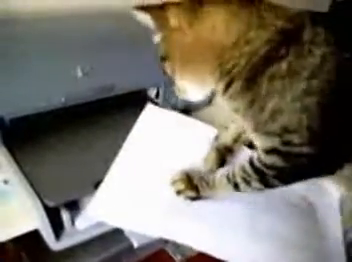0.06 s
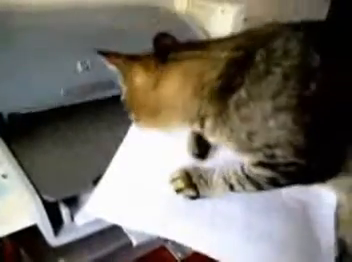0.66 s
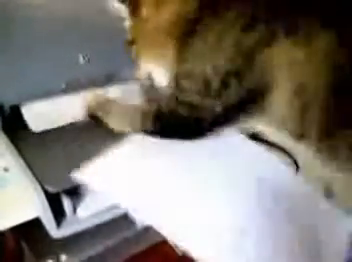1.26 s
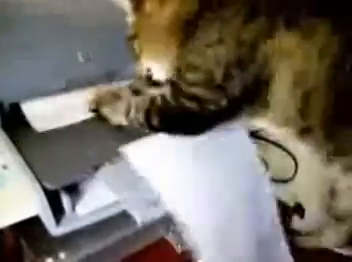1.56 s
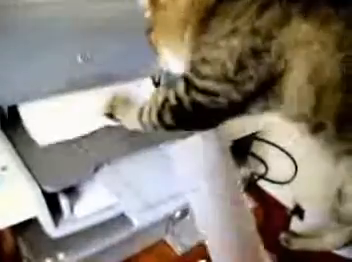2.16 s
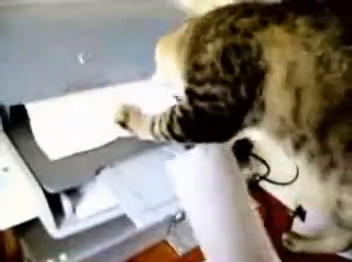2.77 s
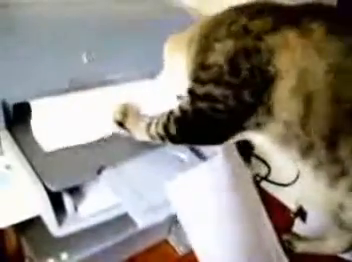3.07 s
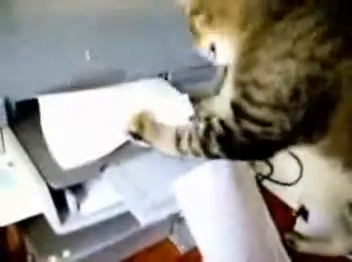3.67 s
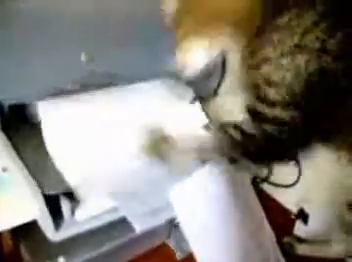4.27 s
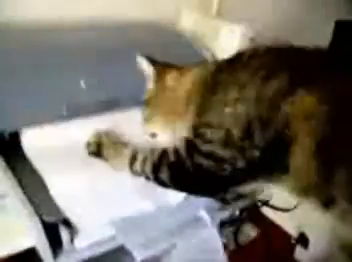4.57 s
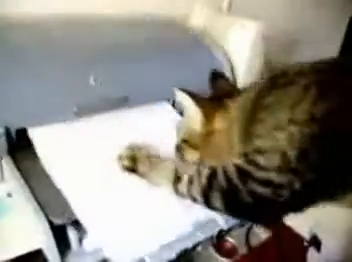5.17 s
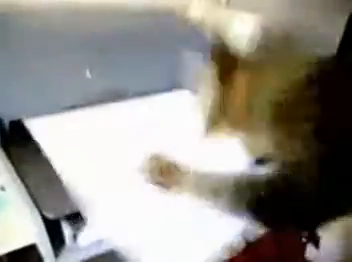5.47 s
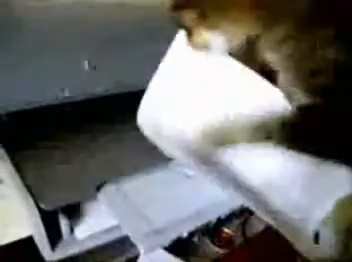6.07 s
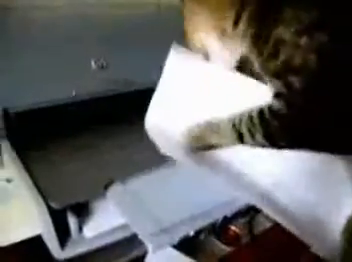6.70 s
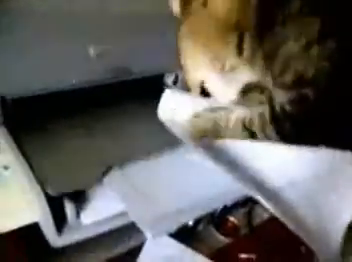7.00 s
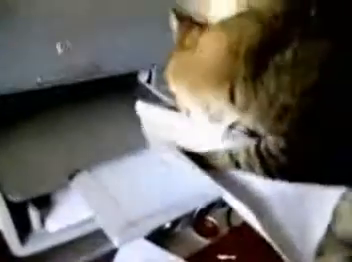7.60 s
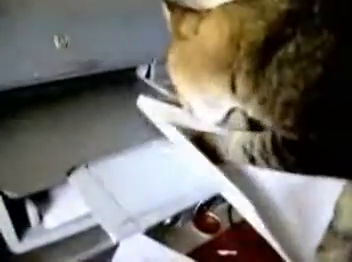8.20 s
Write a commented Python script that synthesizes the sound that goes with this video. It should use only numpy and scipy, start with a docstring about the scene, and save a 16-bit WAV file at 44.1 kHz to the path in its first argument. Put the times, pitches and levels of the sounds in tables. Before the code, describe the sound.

In a small room, a cat's paws crinkle and drag paper in uneven bursts, with dry cracks and occasional low pops against a plastic tray. Underneath, an inkjet printer whines and rattles about five times a second. About two thirds through, the printer stops and the rustling dies down to faint scrapes as the cat nuzzles the sheet. A low hum and flutter continue throughout. The small microphone makes everything sound dull.

```python
"""An inkjet printer steps a sheet out five times a second while a cat paws at the paper and drags it away.
Each step is a short whine of the feed motor, then a carriage sweep that rattles the case.
The paper rustles, buckles and snaps on a ringing plastic tray; now and then it groans or thuds.
The printer stops and the cat nuzzles the sheet, over a quiet hum and a low flutter.
All of it sounds in a small room, heard through a dull little microphone."""
import sys
import numpy as np
from scipy import signal
from scipy.fft import rfft, irfft, next_fast_len
from scipy.io import wavfile
from scipy.ndimage import uniform_filter1d, minimum_filter1d, map_coordinates

SR = 44100
rng = np.random.default_rng(int(sys.argv[2]) if len(sys.argv) > 2 else 0)


def master_out(mix):
    """Clip the mix to full scale and print it as 16-bit PCM to the path in sys.argv[1]."""
    frames = np.transpose(np.atleast_2d(mix))
    ceiling = np.clip(frames, -1, 1)
    pcm = np.round(ceiling * 32767).astype(np.int16)
    wavfile.write(sys.argv[1], SR, pcm)


N = 372491
TIME = np.arange(N) / SR
STEP_TIMES_S = -.093 + .2009 * np.arange(27)

# paper friction spectrum: (frequency [Hz], gain [dB])
FRICTION_SPECTRUM = [(150, -12), (450, -8.5), (750, -3), (1120, 4.5), (1450, -1), (1950, -6.5), (2400, -5),
                     (2850, -2), (3400, -9), (4200, -23.5), (5200, -24), (7000, -29.5), (9000, -54)]


def amp(db):
    return 10 ** (np.asarray(db) / 20)


def unit(x):
    """Scale to rms 1."""
    return x / np.sqrt(np.mean(x ** 2) + 1e-20)


def along(points, hz):
    """Interpolate (Hz, value) points on a log axis."""
    knots_hz, values = np.transpose(points)
    return np.interp(np.log(hz + 1), np.log(knots_hz + 1), values)


def wobble(knots_per_s):
    """Smooth random curve."""
    return map_coordinates(rng.standard_normal(int(N * knots_per_s / SR) + 4), [TIME * knots_per_s])


def coloured(x, spectrum, taps=8192):
    """Minimum-phase filter of unit energy."""
    cepstrum = irfft(np.log(amp(along(spectrum, np.fft.rfftfreq(taps, 1 / SR)))))
    fold = np.r_[1, np.full(taps // 2 - 1, 2), np.zeros(taps // 2)]
    response = irfft(np.exp(rfft(cepstrum * fold)))
    return signal.fftconvolve(x, response / np.linalg.norm(response))[:len(x)]


def noise(spectrum):
    """Coloured noise, rms 1."""
    return unit(coloured(rng.standard_normal(N), spectrum))


def add(track, start_s, sound):
    start = max(round(start_s * SR), 0)
    track[start:start + len(sound)] += sound[:max(N - start, 0)]


def flexing(x, depth_db, width_hz=210, life_s=.03):
    """Shifting resonances of a bending surface: hollow patches come and go."""
    hz, t, bins = signal.stft(x, SR, nperseg=512)
    rows, columns = np.meshgrid(hz / width_hz, t / life_s, indexing="ij")
    patches = map_coordinates(rng.standard_normal((200, 1000)), [rows, columns], order=1, mode="mirror")
    return signal.istft(bins * amp(depth_db * unit(patches)), SR, nperseg=512)[1][:N]


def crinkle(spectrum, slips_per_s, spread_db, smooth=1.0, hollow_db=3):
    """Tiny uneven slips over smooth friction, rms 1."""
    sizes = amp(spread_db * np.minimum(rng.exponential(size=N), 3))
    slips = (rng.random(N) < slips_per_s / SR) * sizes * rng.choice([-1, 1], N)
    rubbing = coloured(unit(slips) + smooth * rng.standard_normal(N), spectrum)
    return unit(flexing(rubbing, hollow_db))


def hum(waver_db=1, noise_db=-41):
    """Wavering hum lines over room noise."""
    # hum lines: (frequency [Hz], rms level [dB])
    lines = [(59.2, -47.5), (150, -57.5), (250, -46), (284, -53)]
    # room noise spectrum: (frequency [Hz], gain [dB])
    noise_spectrum = [(15, -17.5), (33, -4.5), (50, 2.5), (100, 1), (190, -6.5), (290, -6), (400, -10.5),
                      (700, -14.5), (1100, -16.5), (1400, -23), (2000, -26.5), (2900, -25.5), (4300, -43.5),
                      (8000, -53)]
    track = np.zeros(N)
    for hz, db in lines:
        peak = np.sqrt(2) * amp(db + waver_db * wobble(14))
        track += peak * np.sin(2 * np.pi * hz * TIME + .12 * wobble(4.5))
    return track + amp(noise_db) * noise(noise_spectrum)


def flutter(turn_s=.20004, burr_db=-12.5, burr_s=.012, scatter_db=1.7):
    """Low limping flutter: four unequal rounded thumps a turn, each inside a short burr."""
    # thumps of one turn: (offset [s], peak [dB], half width [s], timing scatter [s])
    pattern = [(.031, -29.5, .0024, .002), (.097, -30.5, 0.0019, .002), (.148, -33, .0017, .006),
               (.170, -27.5, 0.0034, .0015)]
    # burr spectrum: (frequency [Hz], gain [dB])
    burr_spectrum = [(40, -22.5), (120, -5.5), (270, 1), (420, -2), (600, -8), (900, -16.5), (2000, -39),
                     (6000, -80.5)]
    thumps, burr_envelope = np.zeros(N), np.zeros(N)
    t = np.arange(-SR // 30, SR // 30) / SR
    for turn_start_s in np.arange(0, N / SR, turn_s):
        for offset_s, db, half_s, scatter_s in pattern:
            late, size, stretch = rng.standard_normal(3)
            u = t / (half_s * np.exp(.2 * stretch))
            start_s = turn_start_s + offset_s + scatter_s * late + t[0]
            gain = amp(db + scatter_db * size)
            add(thumps, start_s, gain * (1 - u ** 2) * np.exp(-u ** 2 / 2))
            add(burr_envelope, start_s, gain * np.exp(-(t / burr_s) ** 2))
    return thumps + amp(burr_db) * burr_envelope * noise(burr_spectrum)


def carriage(delay_s=.079, half_s=.036, sweep_db=-31.5, fall_db_per_s=.9, idle_db=-43):
    """The carriage sweeps across between feed steps and rattles the plastic case."""
    # case rattle spectrum: (frequency [Hz], gain [dB])
    rattle_spectrum = [(60, -12), (160, 0), (240, 4), (320, 1), (500, -2), (800, 0.5), (1120, -0.5),
                       (1400, -12.5), (2000, -18), (2850, -14), (3500, -24.5), (4400, -33), (7000, -39.5),
                       (9000, -70.5)]
    sweeps = np.zeros(N)
    for s in STEP_TIMES_S + delay_s:
        near = np.abs(TIME - s) < 2 * half_s
        sweeps[near] += amp(sweep_db - fall_db_per_s * s) * np.exp(-((TIME[near] - s) / half_s) ** 2)
    idle = amp(idle_db) * np.interp(TIME, [5.5, 6.1], [1, 0])
    return (sweeps + idle) * crinkle(rattle_spectrum, slips_per_s=450, spread_db=-.5, hollow_db=1.5)


def feed_motor(top_hz=840, droop=.078, half_s=.027, whine_db=-33, rise_db_per_s=.19):
    """The motor speeds up and brakes at each step, so its rough gear whine arches in pitch."""
    speed = 1 + .011 * wobble(110)
    chatter = 1 + .22 * wobble(170)
    track = np.zeros(N)
    for s in STEP_TIMES_S[1:]:
        load_db, detune = rng.normal(0, [1.0, .007])
        near = np.abs(TIME - s) < 2 * half_s
        u = (TIME[near] - s) / half_s
        hz = top_hz * (speed[near] + detune) * (1 - droop * np.minimum(u ** 2, 2))
        envelope = amp(whine_db + load_db + rise_db_per_s * s) * np.exp(-np.abs(u) ** 3)
        track[near] += envelope * np.sin(2 * np.pi * np.cumsum(hz) / SR)
    return track * chatter


def stroke_envelope(rows, attack_s=.029, t60_s=.23):
    """Each stroke rises quickly, holds, and dies away as the sheet settles."""
    power = np.zeros(N)
    for s, length_s, db in rows:
        rise = np.clip((TIME - s) / attack_s + .5, 0, 1)
        settling_s = np.clip(TIME - s - length_s, 0, 1)
        power += (rise * amp(db - 60 * settling_s / t60_s)) ** 2
    return np.sqrt(power)


def crumples(folds_per_s=50, spread_db=4, t60_s=.022):
    """Small folds give way in turn, each a short dry burst; rms 1."""
    envelope, t = np.zeros(N), np.arange(SR // 30) / SR
    scatter = np.clip(rng.standard_normal((int(folds_per_s * N / SR), 2)), -1.3, 1.3)
    for k, (late, size) in enumerate(scatter):
        add(envelope, (k + late / 2) / folds_per_s, amp(spread_db * size - 60 * t / t60_s))
    return unit(coloured(envelope * rng.standard_normal(N), FRICTION_SPECTRUM))


def rustle(slide_flap_db=1.5, lump_db=2, lumps_per_s=60, crumple_db=-4.5):
    """Pawed paper rasps and crumples while the whole sheet flaps in the low range."""
    # paw shoves and drags: (start [s], length [s], friction [dB], flapping [dB])
    paw_strokes = [(0.321, 0.046, -41, -39.5), (0.734, .035, -43.5, -42.5), (0.975, .04, -30.5, -30.5),
                   (1.006, 0.16, -26.5, -31.5), (1.182, 0.069, -22, -23), (1.356, 0.015, -25, -29),
                   (1.43, 0.037, -36.5, -48), (1.569, 0.025, -30, -31), (1.678, 0.072, -26, -30.5),
                   (1.804, 0.15, -27.5, -33.5), (1.981, 0.066, -31, -30.5), (2.172, 0.0099, -37.5, -26),
                   (2.333, 0.039, -32, -28.5), (2.457, 0.017, -34.5, -37), (2.577, 0.094, -35.5, -43),
                   (2.785, 0.14, -40, -39.5), (2.996, 0.15, -38, -37.5), (3.121, 0.13, -29, -29),
                   (3.403, 0.059, -31.5, -38), (3.528, 0.089, -36.5, -43), (3.994, 0.012, -33.5, -34.5),
                   (4.222, 0.092, -36.5, -47), (4.293, 0.061, -25, -28.5), (4.39, 0.049, -36, -31.5),
                   (4.496, 0.044, -25.5, -22.5), (4.792, 0.02, -35.5, -35), (5.005, 0.085, -39, -36),
                   (5.128, 0.032, -27.5, -33), (5.235, 0.03, -34, -27.5), (5.328, 0.058, -28.5, -26.5),
                   (5.478, 0.062, -22, -24.5), (5.582, 0.046, -20, -21), (5.658, 0.054, -23, -25.5),
                   (5.82, 0.026, -40, -37), (5.988, 0.029, -35, -25.5)]
    # sheet sliding under the resting paw: (time [s], friction [dB])
    slide_levels = [(.8, -67), (1.0, -43.5), (2.0, -43.5), (2.28, -51.5), (2.85, -54.5), (3.6, -45),
                    (3.85, -49.5), (4.15, -53), (4.6, -46.5), (5.8, -40.5), (6.05, -54.5), (6.25, -75)]
    # flapping sheet spectrum: (frequency [Hz], gain [dB])
    flap_spectrum = [(40, -29.5), (100, -4.5), (200, -3.5), (330, -0.5), (450, -3.5), (600, -3.5),
                     (850, -6.5), (1300, -14.5), (2500, -59)]
    sliding = amp(np.interp(TIME, *np.transpose(slide_levels)))
    start_s, length_s, friction_db, flap_db = np.transpose(paw_strokes)
    friction = np.hypot(stroke_envelope(zip(start_s, length_s, friction_db)), sliding)
    flapping = np.hypot(stroke_envelope(zip(start_s, length_s, flap_db)), amp(slide_flap_db) * sliding)
    flap = crinkle(flap_spectrum, slips_per_s=300, spread_db=-1)
    rasp = crinkle(FRICTION_SPECTRUM, slips_per_s=450, spread_db=3.5, smooth=1.1)
    rasp = unit(rasp * amp(lump_db * wobble(lumps_per_s)))  # the sheet catches and lets go
    folding = amp(crumple_db) * (friction / friction.max()) ** .6
    return flapping * flap + friction * (rasp + folding * crumples())


def tray(x, direct_db=-1):
    """The plastic tray rings along with the paper on it."""
    # tray resonances: (frequency [Hz], bandwidth [Hz], gain [dB])
    modes = [(347, 9, -9.5), (510, 7.4, -7.5), (672, 17, -7.5), (749, 28, -1.5), (1000, 60, -7.5),
             (1140.6, 51, -10.5)]
    ringing = sum(amp(db) * signal.lfilter(*signal.iirpeak(hz, hz / width_hz, fs=SR), x)
                  for hz, width_hz, db in modes)
    return amp(direct_db) * x + ringing


def crack(envelope):
    """Dry noise burst, whitened so that no pitch stands out."""
    bins = rfft(envelope * rng.choice([-1, 1], len(envelope)), 2 * len(envelope))
    power = uniform_filter1d(np.abs(bins) ** 2, size=130)
    burst = irfft(bins / np.sqrt(np.abs(power) + 1e-12))[:len(envelope)]
    return unit(burst) * np.sqrt(np.mean(envelope ** 2))


def snaps(shiver_db=-15, shiver_t60_s=.3, body_db=.5, ring_db=-1, ring_width_hz=230,
          tick_db=3, tick_t60_s=.011, gain_db=-12):
    """A buckle is a dry crack with a bright first tick; the bent sheet rings and shivers briefly."""
    # buckles and strikes: (time [s], relative level [dB], crisp edge [dB], ring [Hz], crack t60 [s])
    buckles = [(.368, -18.5, -7, 870, 0.04), (0.409, -25, 6.5, 1050, .03), (1.015, -4, 1, 1060, .05),
               (1.037, -7, -1, 1150, 0.033), (1.056, -15, 10, 1000, .04), (1.086, -6.5, -12, 900, 0.063),
               (1.112, -4, -15, 770, .04), (1.134, -6.5, -8, 1130, 0.054),
               (1.161, -8.5, -17.5, 1000, 0.046), (1.186, -12, 9.5, 1150, 0.047),
               (1.2, -7.5, 0, 400, 0.074), (1.229, -6, -5, 710, 0.034), (1.257, -13, 2, 990, .03),
               (1.357, -0.5, 4, 1010, 0.045), (1.445, -6, -11, 670, 0.022), (1.537, -23.5, 9, 1000, 0.052),
               (1.586, -6.5, 3, 1004, 0.038), (1.696, -5.5, 9.5, 720, 0.042), (1.714, -8, 0, 560, 0.029),
               (1.73, -16, 5, 1500, 0.033), (1.81, -10.5, -6, 900, .04), (1.824, -9.5, -5.5, 760, .04),
               (1.88, -12.5, 10.5, 550, 0.052), (2.169, -15, -7, 870, 0.072), (2.343, -14, 1.5, 870, 0.06),
               (2.39, -10, -11, 706, 0.038), (2.457, -22.5, 7.5, 900, 0.062),
               (2.529, -24, 11.5, 760, 0.037), (2.574, -16, -3, 850, 0.057), (2.594, -18, 13.5, 960, 0.037),
               (2.643, -5.5, 10.5, 720, 0.035), (2.762, -10.5, 7, 720, 0.045),
               (2.981, -19, 8.5, 775, 0.036), (3.044, -15.5, 2, 950, 0.081),
               (3.104, -20, 13.5, 1060, 0.042), (3.126, -3, -0.5, 850, 0.045),
               (3.189, -14.5, 5, 1100, 0.03), (3.241, -5.5, 1, 590, 0.039), (3.257, -6, 2.5, 420, 0.041),
               (3.386, -14, -8.5, 1140, 0.03), (3.405, -11.5, -2, 700, 0.04), (3.432, -19, 7, 900, .04),
               (4.336, -10, 8, 1100, 0.046), (4.422, -22.5, 14.5, 890, 0.03),
               (4.498, -16, 15.5, 600, 0.071), (4.511, -8, 11, 980, 0.057), (4.522, -10, 4.5, 650, .04),
               (4.81, -16, -5, 1080, 0.04), (5.241, -12, -9, 1085, .04), (5.256, -11.5, -7, 800, 0.049),
               (5.398, -18, 9.5, 400, .03), (5.411, -6, -4.5, 720, 0.026), (5.452, -5, 0, 620, .025),
               (5.48, -8.5, -0.5, 560, 0.082), (5.505, -9, -2, 1000, 0.039), (5.538, -7, 1.5, 400, .03),
               (5.552, 2, -8, 1100, 0.022), (5.584, -1.5, -15, 700, 0.033), (5.593, -2, 0, 750, 0.05),
               (5.617, -1, 7.5, 746, 0.044), (5.645, -8.5, 7.5, 1000, 0.059), (5.68, -9, 4.5, 1070, 0.09),
               (5.985, -19.5, 0, 340, 0.056), (6.002, -12.5, -1, 500, 0.053),
               (6.369, -21.5, -1, 897, 0.045), (6.713, -25.5, -2, 600, 0.071),
               (6.791, -24.5, -2, 660, 0.057), (6.843, -22, 0, 1110, 0.061), (7.228, -33.5, 6, 580, 0.053),
               (7.384, -36.5, 11, 590, 0.049), (8.341, -22.5, 5, 813, 0.057)]
    # snapping sheet spectrum: (frequency [Hz], gain [dB])
    snap_spectrum = [(60, -6), (250, 3.5), (500, -1), (750, 1.5), (1120, 0), (1450, -5), (1950, -13),
                     (2400, -7), (2850, -1), (3400, -16.5), (4200, -22.5), (5200, -32), (7000, -31),
                     (9000, -51.5)]
    track, t = np.zeros(N), np.arange(SR // 5) / SR
    body_band = signal.butter(2, 550, fs=SR, output="sos")
    edge_band = signal.butter(1, 1900, "high", fs=SR, output="sos")
    tick_band = signal.butter(3, 4760, "high", fs=SR, output="sos")
    for s, db, edge_db, ring_hz, t60_s in buckles:
        burst = crack(amp(-60 * t / t60_s) + amp(shiver_db - 60 * t / shiver_t60_s))
        body = (amp(body_db) - 1) * signal.sosfilt(body_band, burst)
        edge = (amp(edge_db) - 1) * signal.sosfilt(edge_band, burst)
        resonance = signal.iirpeak(ring_hz, ring_hz / ring_width_hz, fs=SR)
        ring = amp(ring_db) * signal.lfilter(*resonance, burst)
        tick = amp(tick_db + edge_db) * signal.sosfilt(tick_band, burst * amp(-60 * t / tick_t60_s))
        add(track, s, amp(db + gain_db) * (burst + body + edge + ring + tick))
    return coloured(track, snap_spectrum)


def groans(glide_oct_per_s=-2.2, roughness=.17):
    """The dragged sheet sticks and slips, ringing on one brief sinking note."""
    # groans and squeaks: (centre [s], half length [s], pitch [Hz], level [dB])
    notes = [(.617, 0.028, 224, -27), (3.168, 0.023, 360, -25.5), (3.283, 0.013, 335, -27.5),
             (3.586, 0.034, 262.8, -27), (5.686, 0.031, 1093, -19.5), (6.413, .0065, 4070, -56)]
    track = np.zeros(N)
    for s, half_s, hz, db in notes:
        near = np.abs(TIME - s) < .12
        t = TIME[near] - s
        phase = 2 * np.pi * np.cumsum(hz * 2 ** (glide_oct_per_s * t)) / SR
        track[near] += amp(db) * np.exp(-(t / half_s) ** 2) * np.sin(phase)
    return track * (1 + roughness * wobble(97))


def thuds(attack_s=.0022, glide_oct_per_s=-2.5):
    """The bowed sheet pops through and rings low, sinking as it relaxes."""
    # hollow pops: (time [s], pitch [Hz], level [dB], t60 [s])
    pops = [(1.086, 199, -20, .07), (3.215, 274, -18, .07), (3.238, 531, -14, 0.068),
            (3.24, 349, -18.5, 0.082), (3.257, 250, -14, 0.094), (3.431, 240, -19, 0.082),
            (3.619, 373, -22, 0.065), (4.003, 273, -22.5, .11), (6.0, 490, -23.5, 0.13)]
    track, t = np.zeros(N), np.arange(SR // 6) / SR
    for s, hz, db, t60_s in pops:
        phase = 2 * np.pi * np.cumsum(hz * 2 ** (glide_oct_per_s * t)) / SR
        envelope = amp(db - 60 * t / t60_s) * (1 - np.exp(-t / attack_s))
        add(track, s, envelope * np.sin(phase))
    return track


def nuzzles():
    """The cat's face softly scrapes the loose sheet."""
    # face rubs: (start [s], length [s], level [dB])
    rubs = [(6.12, 0.022, -44.5), (6.365, 0.021, -47.5), (6.79, 0.069, -53), (6.98, 0.13, -50),
            (7.21, 0.028, -47.5), (7.55, 0.15, -50.5), (8.34, 0.16, -50)]
    # scraped sheet spectrum: (frequency [Hz], gain [dB])
    scrape_spectrum = [(200, -30.5), (700, 2), (1120, 1), (1500, 0.5), (2000, -2), (2850, -3), (3400, -7),
                       (4300, -29.5), (7000, -25.5), (9000, -37)]
    return stroke_envelope(rubs) * crinkle(scrape_spectrum, slips_per_s=400, spread_db=3, smooth=.9)


def room(x, delay_s=.005):
    """Wall reflections; the tail changes from block to block as the cat and the paper move."""
    # reverberation time: (frequency [Hz], t60 [s])
    decay_times = [(200, 0.49), (530, 0.45), (1400, 0.21), (3700, 0.15), (8000, 0.19)]
    wet, hop = np.zeros(N), SR // 3
    for start in range(0, N, hop):
        hz, t, bins = signal.stft(rng.standard_normal(SR // 2), SR, nperseg=256)
        decay = amp(-60 * t / along(decay_times, hz)[:, None])
        tail = signal.istft(bins * decay, SR, nperseg=256)[1]
        reflections = signal.fftconvolve(x[start:start + hop], tail / np.linalg.norm(tail))
        add(wet, start / SR + delay_s, reflections)
    return wet


def scene(room_db=-11.5):
    """Printer and paper in the small room, over hum and flutter; mono."""
    paper = tray(rustle() + nuzzles() + snaps()) + groans() + thuds()
    printer = feed_motor() + carriage()
    direct = paper + printer
    return (direct + room(amp(room_db) * direct) + hum() + flutter())[None]


def record(dry):
    """Small microphone: treble notch, quick limiter, low band limit."""
    # microphone response: (frequency [Hz], gain [dB])
    response = [(3000, 1), (5100, 1.5), (5800, -11.5), (6700, 4), (7400, -2.5), (8400, -16.5)]
    ceiling, hold_s, top_hz = .9, .004, 8450
    size, hold = next_fast_len(N + SR // 2), int(hold_s * SR)
    hz = np.fft.rfftfreq(size, 1 / SR)
    notched = irfft(rfft(dry, size) * amp(along(response, hz)), size)
    needed_gain = ceiling / np.maximum(np.abs(notched), ceiling)
    gain = uniform_filter1d(minimum_filter1d(needed_gain, 2 * hold), hold)
    return irfft(rfft(notched * gain) * (hz < top_hz), size)[:, :N]


dry = scene()
out = record(dry)
master_out(out)
```